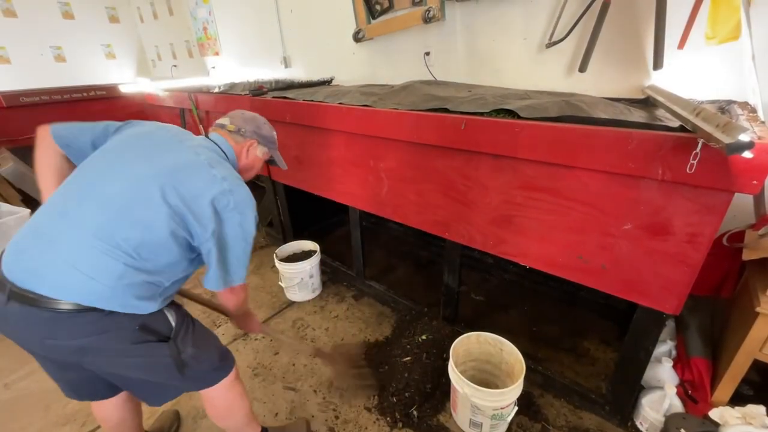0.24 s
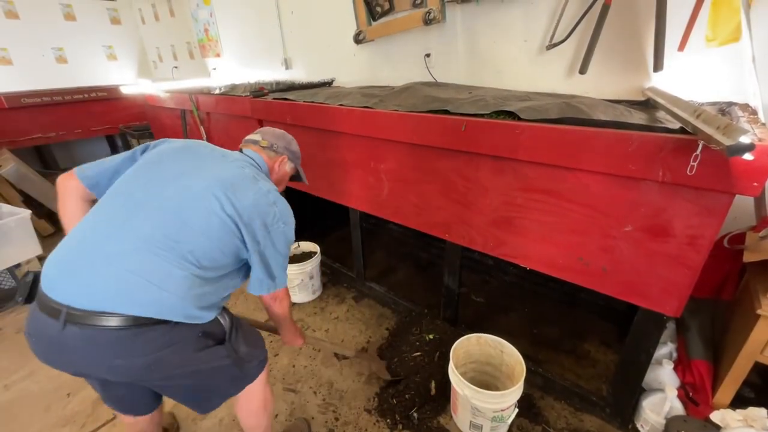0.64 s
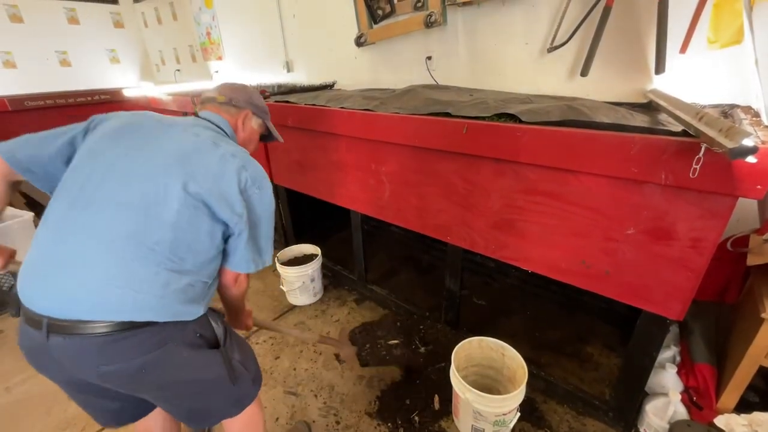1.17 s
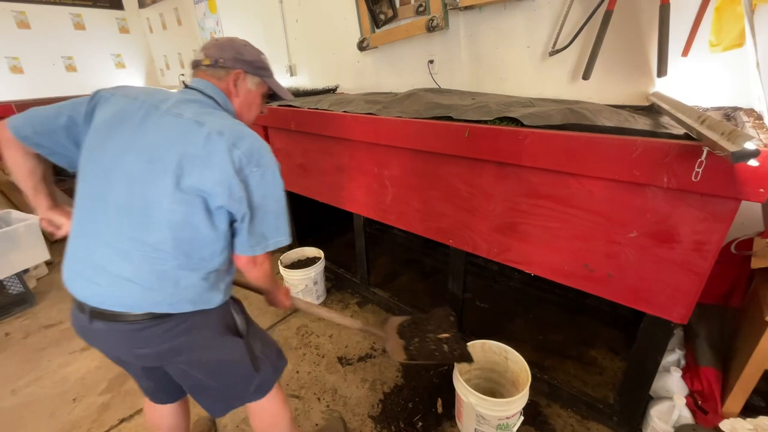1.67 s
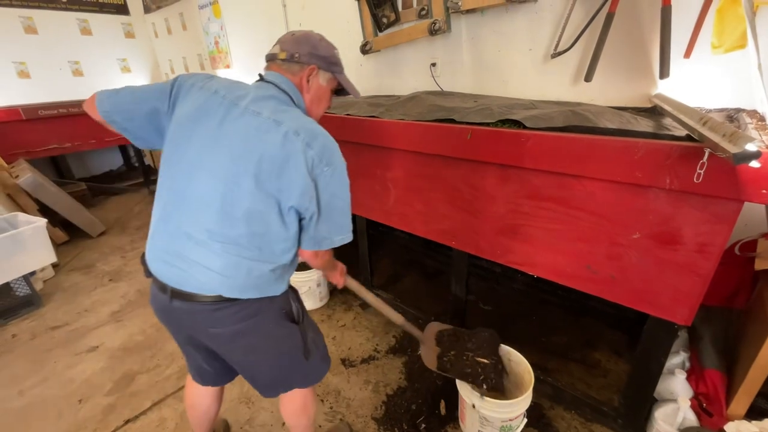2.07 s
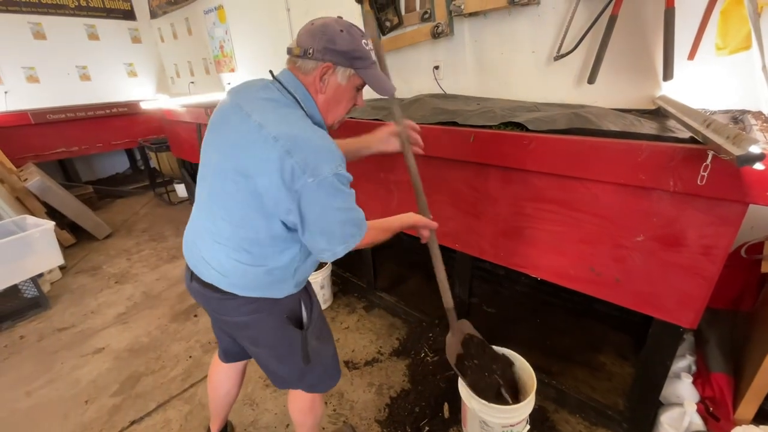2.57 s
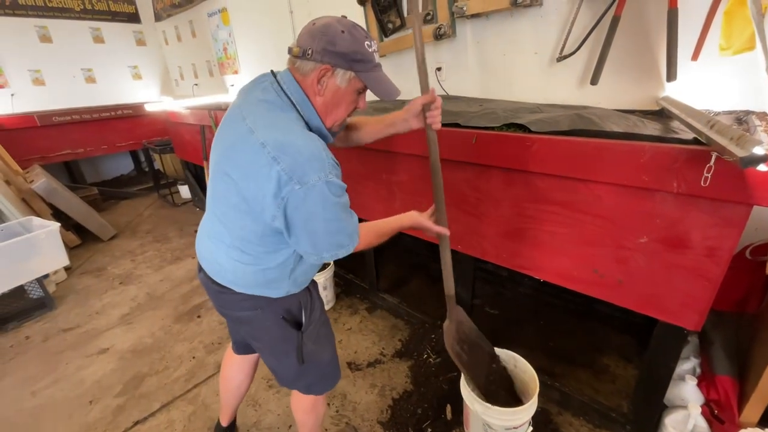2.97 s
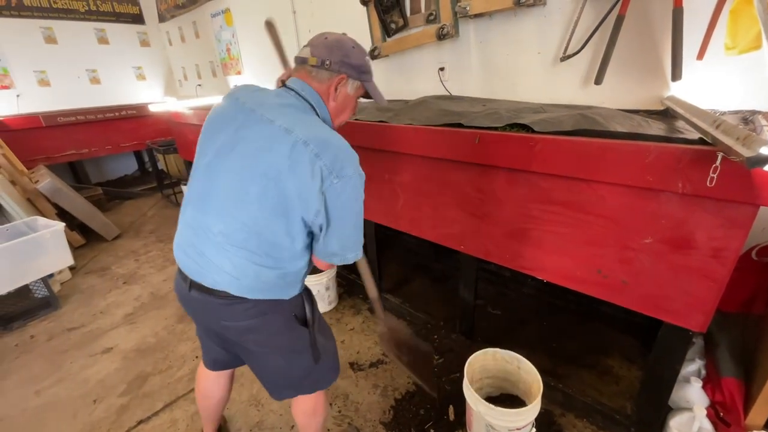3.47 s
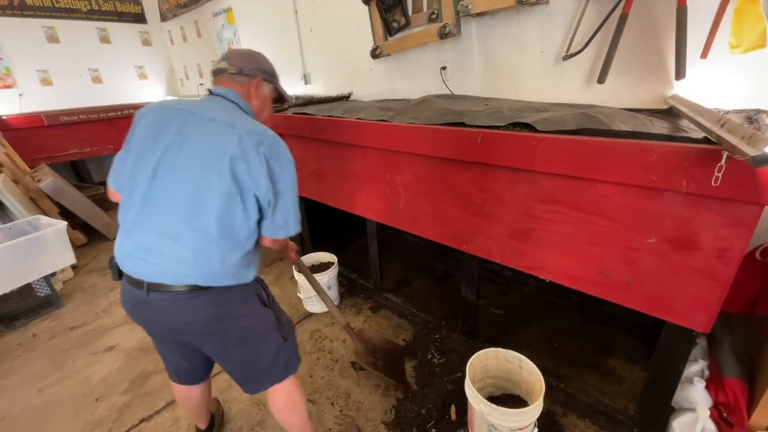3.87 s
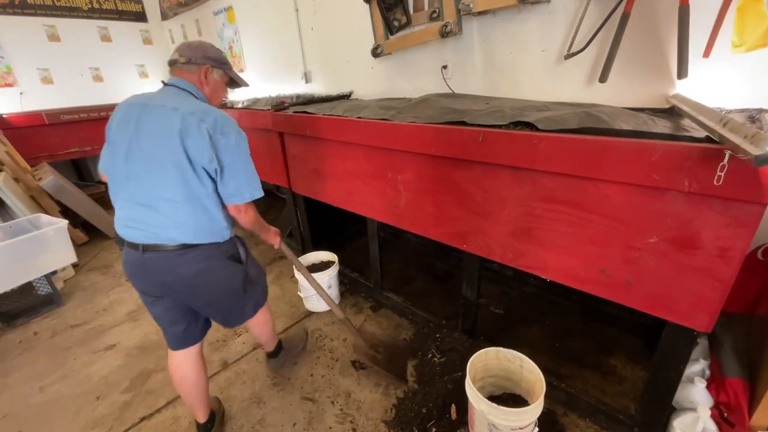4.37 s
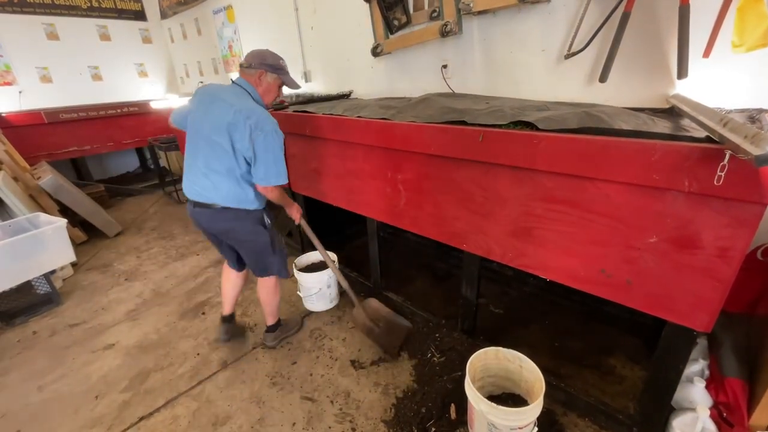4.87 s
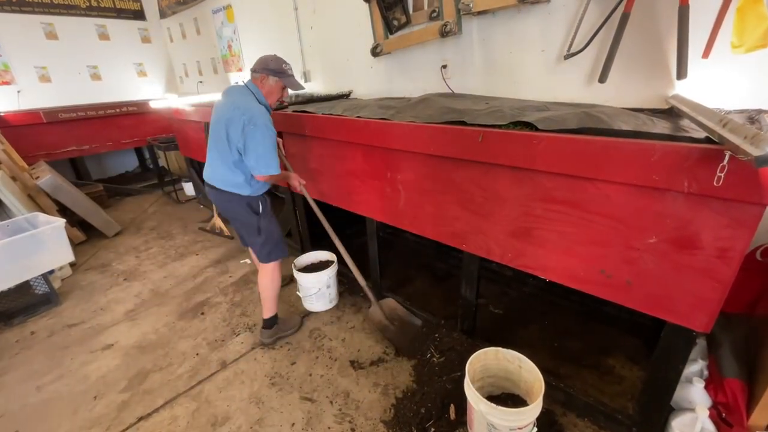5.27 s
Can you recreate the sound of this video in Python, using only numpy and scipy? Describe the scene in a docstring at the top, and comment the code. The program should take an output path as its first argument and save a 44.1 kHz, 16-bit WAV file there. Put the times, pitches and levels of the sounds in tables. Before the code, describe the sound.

A close stereo take of shovelling in a hard-walled garage, over a faint low building rumble. From the start a steel blade grinds loudly on concrete, coarse and sandy, fading after about 0.3 seconds, with a soft contact near 0.8. A quieter stretch holds only tiny touches. Around 1.6 to 1.9 the loaded blade shifts and a heavy lump hits a plastic bucket; from 2.0 to 2.9 come hollow knocks, a strong dull thump near 2.35, pattering crumbs and trickling sand. The pouring thins to near quiet by 3.2, with a barely audible thin high ring. At about 3.86 the blade clashes onto gritty floor and bounces with bright, weakening clanks until 4.3. A faint drag follows around 4.4. At 5.0 a sharp metallic strike rings, a deep thud lands near 5.1, and shorter, softer scrapes push into the soil, dying away at the end.

```python
"""A steel shovel scrapes damp soil off a concrete garage floor and tips it into a plastic bucket.
The blade then bounces back over the floor, drags, strikes down and pushes into the heap again.
Scraping is random grit impacts filtered by floor and blade; blows are noise bursts that excite modes.
Pouring is random impacts of crumbs, sand and lumps; thuds are sinking sines with a dull scuff.
Bare walls prolong it all by decaying noise echoes, over a low rumble of the building."""
import sys
import numpy as np
from scipy import signal
from scipy.fft import rfft, irfft, next_fast_len
from scipy.io import wavfile
from scipy.ndimage import uniform_filter1d

SR = 44100
rng = np.random.default_rng(int(sys.argv[2]) if len(sys.argv) > 2 else 0)


def materialize(psi):
    """Save the field psi as 16-bit PCM at rate SR to the path in sys.argv[1].

    A 1-D psi becomes a single channel; in a 2-D psi each row is a channel.
    """
    bounded = np.clip(np.atleast_2d(psi).T, -1, 1)
    quanta = np.round(bounded * 32767).astype(np.int16)
    wavfile.write(sys.argv[1], SR, quanta)


N = 243873
TIME = np.arange(N) / SR  # seconds

# Strokes of the blade over concrete. Each row: start in seconds, attack in seconds, hold in seconds,
# release to -60 dB in seconds, grinding in dB, crushed sand and soil load each in dB re grinding.
BLADE_STROKES = [(0, 0.019, 0.26, .75, -17, 1, -28.5), (4.379, .12, 0.15, 0.11, -40.5, -3, -6.5),
                 (5.148, 0.033, 0.094, 0.07, -29, -1.5, -4.5), (5.347, 0.09, .02, 2.4, -25, -6.5, -2)]
# The blade hits the floor or rattles as it is lifted. Each row: start in seconds, relative level in dB,
# relative treble in dB, rise in seconds, relative ring in dB.
BLADE_STRIKES = [(0.784, -29.5, -25, 0.017, -17), (0.985, -47, -22, .0008, -18),
                 (1.149, -47.5, -27, 0.0064, -12), (1.647, -32.5, -3, 0.0044, -15),
                 (3.854, -27, -5, 0.004, -15), (3.862, -11.5, 3.5, 0.0045, -3),
                 (3.9764, -15.5, 8.5, 0.00091, -4), (4.0738, -20.5, 8, 0.00096, -7),
                 (4.215, -25, 3, 0.011, -4), (4.3433, -36.5, 9.5, 0.0013, 0), (4.994, -15, 8.5, 0.0017, 4),
                 (5.156, -23, 6, 0.00091, -8)]
# Soil leaves the blade: spilt on the way, the bulk tipped in, the rest shaken out, the last crumbs.
# Each row: start in seconds, attack in seconds, hold in seconds, release to -60 dB in seconds,
# then relative levels in dB of the patter of crumbs, fine sand, drumming of the bucket.
SOIL_FLOWS = [(1.492, .08, 0.49, 2, -58.5, -52, -55), (1.882, 0.029, 0.151, 0.15, -27.5, -41, -28.5),
              (2.126, 0.12, 0.75, 0.55, -34, -40, -37), (3.336, 0.6, .29, .2, -69, -47.5, -67)]
# Clods and the blade knock on plastic. Each row: start in seconds, relative level in dB,
# sharp tick in dB re the knock, decay time in seconds.
BUCKET_KNOCKS = [(1.797, -37, -1.5, .0016), (1.878, -32.5, -21, 0.0029), (1.918, -17, -14.5, 0.023),
                 (2.026, -24, -0.5, 0.02), (2.241, -16, -36, 0.0033), (2.35, -10.5, -29, 0.0079),
                 (2.458, -13.5, -8, 0.0026), (2.515, -14.5, -32, .011), (2.715, -14, -7, 0.0024),
                 (2.857, -23, -24, 0.0029), (2.925, -25.5, -4, 0.012)]
# Footfalls, heavy lumps and the blade meeting the heap. Each row: start in seconds,
# relative level in dB, starting pitch in Hz, final pitch in Hz.
DULL_THUDS = [(0.019, -31, 386, 293), (1.638, -30, 247, 104), (1.831, -29, 442, 313),
              (1.917, -13, 240, 215), (2.356, -12.5, 297, 94), (2.56, -23, 204, 131),
              (2.758, -23, 210, 185), (3.745, -35.5, 157, 106), (4.62, -28.5, 212, 200),
              (4.998, -31.5, 257, 220), (5.071, -20.5, 420, 217), (5.088, -13.5, 224, 56),
              (5.218, -30, 113, 70)]

# Modes of the free steel blade. Each row: frequency in Hz, relative energy in dB, t60 in seconds.
BLADE_MODES = [(450, -7.5, 0.43), (538.6, -1, 0.46), (851, -4.5, 0.13), (970, -12, 0.28), (1734, 3.5, 0.12),
               (1924, 2, 0.086), (1983, 2, 0.096), (2176, -3.5, 0.09), (2490, -3, 0.16), (3010, -4, 0.062),
               (3080, -11, .12), (3700, -1.5, .1), (3816, -1, .14), (5870, -6.5, 0.07), (6600, -8.5, .08)]
# Modes of the bucket. Each row: frequency in Hz, relative energy in dB, t60 in seconds.
BUCKET_MODES = [(78, -1, 0.18), (118, 2.5, 0.21), (185, -9, 0.28), (221, 8.5, 0.073), (240, 0.5, 0.072),
                (477, -18, .2), (583, -4, 0.18)]

# Spectra of the contacts and the air. Each row: frequency in Hz, relative level in dB per Hz.
# The edge grinding on concrete:
GRIND_SPECTRUM = [(60, -64), (170, -33.5), (350, -7.5), (700, -8.5), (1200, 2), (1850, 4), (2500, 1),
                  (3300, -3), (4600, -11.5), (6000, -4), (7500, -14.5), (11000, -36)]
# Sand crushed or struck by something hard:
SAND_SPECTRUM = [(200, -57), (1500, -15.5), (4500, -4.5), (7000, -4.5), (8500, -1), (11000, -2),
                 (13500, -4), (16000, -15)]
# Soil shaken on the blade or pressed by a weight:
LOAD_SPECTRUM = [(80, -34.5), (150, -16), (220, 2), (290, -6.5), (420, -1.5), (550, -5), (680, -12.5),
                 (1150, -8), (3000, -38.5)]
# The blade landing on gritty concrete:
CRUNCH_SPECTRUM = [(120, -10), (380, -5.5), (550, -5), (750, -4), (1200, -2.5), (1900, 4.5), (3100, -0.5),
                   (4600, -12.5), (6200, -7), (8000, -23), (14000, -8)]
# Crumbs on plastic:
CRUMB_SPECTRUM = [(120, -20), (330, -12), (540, -3), (800, -11), (1300, -4), (1900, -7.5), (2600, -20),
                  (4200, -27), (6000, -37), (12000, -58)]
# Fine sand trickling off the steel:
TRICKLE_SPECTRUM = [(900, -1), (2400, 3.5), (4200, -4), (6000, -2), (8500, -4.5), (11500, 0), (16000, -5.5)]
# A hollow knock on plastic:
KNOCK_SPECTRUM = [(100, -30.5), (330, -2.5), (620, 9.5), (900, 2), (1300, 2.5), (1900, 2), (2700, -8),
                  (5000, -21), (12000, -31)]
# The rumble of the building:
AIR_SPECTRUM = [(25, -27.5), (40, -24), (65, 0.5), (90, 2.5), (130, -7), (240, -12.5), (500, -14.5),
                (1000, -19), (2500, -24.5), (5000, -40), (9000, -48.5), (16000, -73.5)]

# Reverberation of the garage. Each row: frequency in Hz, t60 in seconds.
GARAGE_T60 = [(100, 0.7), (400, 0.61), (1500, 0.64), (4000, 0.85), (8000, 0.76), (15000, 0.38)]
# Colour of the walls' tail. Each row: frequency in Hz, relative level in dB.
TAIL_COLOUR = [(150, -7), (600, -2.5), (6500, -1), (10000, -4)]
# Stereo width of the sound. Each row: frequency in Hz, gain of the side signal in dB.
STEREO_WIDTH = [(100, -23.5), (220, -11), (400, -2.5), (700, 6), (1300, -5.5), (2400, 0.5), (6800, 2),
                (8000, -2), (15000, -29)]
# Stereo balance of the sound. Each row: frequency in Hz, left minus right in dB.
STEREO_BALANCE = [(380, 0), (680, 5.5), (1100, 5.5), (1700, 3), (2500, 5), (3800, 3), (4900, -0.5),
                  (6000, -7), (7000, -4), (7800, 0.5)]


def scraping(blade):
    """Stick-slip friction: the edge catches and slips on grit, rings, crushes sand and shakes the load."""
    grind, sand, load = np.zeros((3, N))
    for start, attack, hold, release, db, gritty_db, laden_db in BLADE_STROKES:
        movement = gesture(start, attack, hold, release)
        grind += undb(db) * movement
        sand += undb(db + gritty_db) * movement
        load += undb(db + laden_db) * movement
    # a slow and a quick wander, limited to 3 dB up or down
    judder = undb(3 * np.tanh(0.5 * walk(rate=67) + walk(rate=350)))
    # some slips rasp on the floor, others catch the edge and set the steel ringing
    floor = body(GRIND_SPECTRUM)
    rasp = unit(through(grains(rate=8300, spread_db=2) * judder, floor))
    catches = unit(through(grains(rate=8300, spread_db=2) * judder, floor))
    steel = unit(rasp + undb(-6) * unit(through(catches, blade)))
    hiss = unit(through(grains(rate=8000, spread_db=0.5) * judder, body(SAND_SPECTRUM)))
    rumble = unit(through(grains(rate=2200, spread_db=4.5) * judder, body(LOAD_SPECTRUM)))
    return grind * steel + sand * hiss + load * rumble


def strikes(blade, strike_db=23, ring_db=-3, tick_db=-7, decay_s=0.01):
    """Impact excitation: the blade lands on gritty concrete, and the brief force sets its modes ringing."""
    out = np.zeros(N)
    steel, sand = body(CRUNCH_SPECTRUM), body(SAND_SPECTRUM)
    for start, db, treble_db, rise, bright_db in BLADE_STRIKES:
        clash = through(crunch(decay_s, rise), steel)
        clang = undb(ring_db + bright_db) * through(crunch(decay_s, rise), blade)
        grit = undb(tick_db + treble_db) * through(crunch(decay_s, rise), sand)
        add(out, start, undb(db + strike_db) * (clash + clang + grit))
    return out


def pouring(bucket, patter_db=-1, sand_db=-2, drum_db=-2):
    """Random impacts: crumbs patter on plastic, sand trickles off the steel, lumps drum the bucket."""
    patter, sand, drum = np.zeros((3, N))
    for start, attack, hold, release, crumb_db, fine_db, lump_db in SOIL_FLOWS:
        movement = gesture(start, attack, hold, release)
        patter += undb(crumb_db + patter_db) * movement
        sand += undb(fine_db + sand_db) * movement
        drum += undb(lump_db + drum_db) * movement
    clumps = undb(3.2 * walk(rate=70))  # crumbs and sand fall unevenly
    crumbs = unit(through(grains(rate=900, spread_db=0) * clumps, body(CRUMB_SPECTRUM)))
    trickle = unit(through(grains(rate=2500, spread_db=3.5) * clumps, body(TRICKLE_SPECTRUM)))
    lumps = unit(through(grains(rate=400, spread_db=6.5), bucket))
    return patter * crumbs + sand * trickle + drum * lumps


def knocks(bucket, knock_db=21, drum_db=-12):
    """Impact on a hollow shell: short knocks excite the bucket, some with the sharp tick of a stone."""
    out = np.zeros(N)
    hollow, sand = body(KNOCK_SPECTRUM), body(SAND_SPECTRUM)
    for start, db, sharp_db, length in BUCKET_KNOCKS:
        force = crunch(length, rise=0.00083)
        knock = through(force, hollow) + undb(drum_db) * through(force, bucket)
        tick = undb(sharp_db) * through(crunch(length / 2, rise=0.0002), sand)
        add(out, start, undb(db + knock_db) * (knock + tick))
    return out


def thuds(thud_db=4, t60=0.096, rise=0.0017, settle_s=0.01, scuff_db=12):
    """Damped oscillation: a few low cycles sink in pitch as the weight settles, with a dull scuff."""
    out, t = np.zeros(N), TIME[:SR // 3]
    soil = body(LOAD_SPECTRUM)
    for start, db, start_hz, end_hz in DULL_THUDS:
        pitch = end_hz + (start_hz - end_hz) * np.exp(-t / settle_s)
        phase = 2 * np.pi * np.cumsum(pitch) / SR
        thump = np.sin(phase) * (1 - np.exp(-t / rise)) * undb(thud_db - 60 * t / t60)
        scuff = undb(scuff_db) * through(crunch(length=0.02, rise=0.003), soil)
        add(out, start, undb(db) * (thump + scuff))
    return out


def thin_ring(hz=5798, db=-57, start_s=3.18, attack_s=0.016, hold_s=0.059, release_s=0.56):
    """A pure tone with a random envelope: it wavers and fades as the emptied blade is lifted."""
    level = undb(db + 2 * walk(rate=58))
    return np.sin(2 * np.pi * hz * TIME) * gesture(start_s, attack_s, hold_s, release_s) * level


def garage(x, direct_db=-5, count=6, spots_per_s=10):
    """Direct and reflected sound: the shovel keeps moving, so the echo pattern fades from spot to spot."""
    out = undb(direct_db) * x
    place = TIME * spots_per_s
    for spot in range(count):
        # the spots recur in a loop, neighbours crossfading at equal power
        away = np.abs((place - spot + count / 2) % count - count / 2)
        nearness = np.sqrt(np.clip(1 - away, 0, 1))
        out = out + through(x * nearness, reflections())
    return out


def reflections(near_db=-6, tail_db=-4, near_s=0.0047):
    """Diffuse decay from one spot to one microphone: scatter from floor and bench, then the walls' tail."""
    t = TIME[:SR]
    hz, s, cells = signal.stft(rng.standard_normal(SR), SR, nperseg=256)
    t60 = along(GARAGE_T60, hz)[:, None]
    colour_db = along(TAIL_COLOUR, hz)[:, None]
    tail = signal.istft(cells * undb(colour_db - 60 * s / t60), SR)[1][:SR]
    tail = tail * (1 - np.exp(-t / 0.00057))
    near = rng.standard_normal(SR) * np.exp(-t / near_s) * (1 - np.exp(-t / 0.001))
    # small objects scatter only the short waves
    near = signal.sosfilt(signal.butter(2, 700, "high", fs=SR, output="sos"), near)
    return undb(near_db) * near / np.linalg.norm(near) + undb(tail_db) * tail / np.linalg.norm(tail)


def air(level_db=-55):
    """Filtered noise: the low rumble of the building, its level wandering slightly."""
    return undb(level_db + walk(rate=12)) * unit(through(rng.standard_normal(N), body(AIR_SPECTRUM)))


def gesture(start, attack, hold, release, swell_db=-8, onset_s=0.0041):
    """Envelope of one movement: it swells from below its level, holds, then dies away exponentially."""
    t = TIME - start
    swell = swell_db * np.clip(1 - t / attack, 0, 1)
    fall = -60 * np.maximum(t - attack - hold, 0) / release
    return np.clip(t / onset_s, 0, 1) * undb(swell + fall)


def crunch(length, rise):
    """Force of a gritty contact: a dense cluster of fractures, as noise that dies away; unit energy."""
    t = TIME[:SR // 3]
    envelope = (1 - np.exp(-t / max(rise, 0.0001))) * np.exp(-t / max(length, 0.001))
    force = rng.standard_normal(len(t)) * envelope
    return force / np.linalg.norm(force)


def grains(rate, spread_db):
    """Poisson-like impacts: random tiny clicks, rate a second on average, of scattered size; rms 1."""
    size = undb(spread_db * np.clip(rng.standard_normal(N), -2, 2))
    hits = rng.random(N) < rate / SR
    return unit(hits * size * rng.choice([-1, 1], N))


def walk(rate):
    """Low-frequency fluctuation: random values, rate a second, joined smoothly; rms 1."""
    k = int(SR / rate)
    steps = np.repeat(rng.standard_normal(N // k + 1), k)
    return unit(uniform_filter1d(steps, k)[:N])


def ring(modes, damping=1):
    """Modal superposition: decaying sines of unit energy in all; damping above 1 shortens them."""
    t = TIME[:SR // 2]
    h = np.zeros(len(t))
    for hz, db, t60 in modes:
        decay = undb(db - 60 * damping * t / t60) / np.sqrt(t60)
        h += decay * np.sin(2 * np.pi * hz * t + rng.uniform(0, 2 * np.pi))
    return h / np.linalg.norm(h)


def body(points):
    """Heavy damping: a body that answers with a short response of unit energy."""
    h = minimum_phase(points)
    return h / np.linalg.norm(h)


def minimum_phase(points, size=4096):
    """Causality: folding the cepstrum gives the minimum-phase response with the given spectrum."""
    hz = np.arange(size // 2 + 1) * SR / size
    cepstrum = irfft(np.log(undb(along(points, hz))))
    cepstrum[1:size // 2] *= 2
    cepstrum[size // 2 + 1:] = 0
    return irfft(np.exp(rfft(cepstrum)))


def through(x, response):
    """Linear filtering: convolve a sound with an impulse response."""
    return signal.fftconvolve(x, response)[:len(x)]


def along(points, hz):
    """Interpolation of a table on a log-frequency axis."""
    f, value = np.transpose(points)
    return np.interp(np.log(hz + 1), np.log(f), value)


def add(out, s, sound):
    """Superposition: mix a sound in at time s."""
    start = max(int(s * SR), 0)
    out[start:start + len(sound)] += sound[:N - start]


def unit(x):
    """Normalisation to rms 1."""
    return x / np.sqrt(np.mean(x ** 2))


def undb(db):
    """Logarithmic level: decibels to amplitude gain."""
    return 10 ** (np.asarray(db) / 20)


def scene():
    """Superposition of all the shovel work, heard in the room from two microphones."""
    blade, bucket = ring(BLADE_MODES), ring(BUCKET_MODES)
    pressed_blade = ring(BLADE_MODES, damping=1.5)  # floor and soil mute the steel while it slides
    work = scraping(pressed_blade) + strikes(blade) + pouring(bucket)
    work = work + knocks(bucket) + thuds() + thin_ring()
    return np.array([undb(-0.5) * garage(work) + air() for _ in range(2)])


def record(dry, top_hz=16000):
    """Mid-side stereo: width and balance vary with frequency, the treble is nearly mono, nothing above top_hz."""
    size = next_fast_len(N + SR // 4)
    left, right = rfft(dry, size)
    hz = np.arange(len(left)) * SR / size
    mid = (left + right) / 2
    side = (left - right) / 2 * undb(along(STEREO_WIDTH, hz))
    lean = undb(along(STEREO_BALANCE, hz) / 2)  # half of the difference goes to each side
    pair = irfft(np.array([(mid + side) * lean, (mid - side) / lean]), size)[:, :N]
    return signal.sosfilt(signal.ellip(10, 0.2, 80, top_hz, fs=SR, output="sos"), pair)


dry = scene()
out = record(dry)
materialize(out)
```